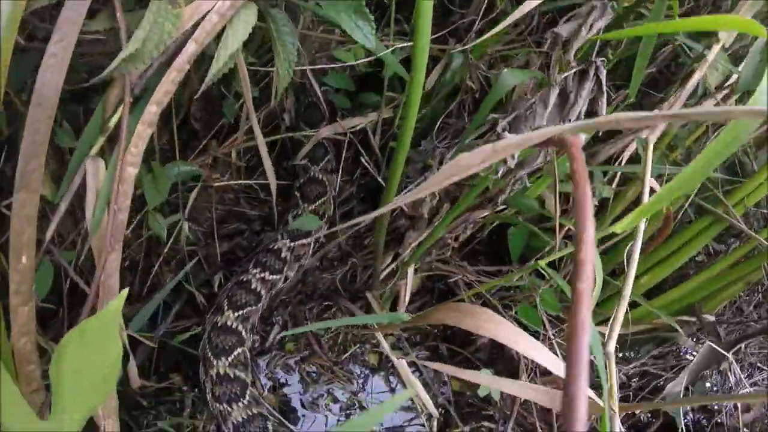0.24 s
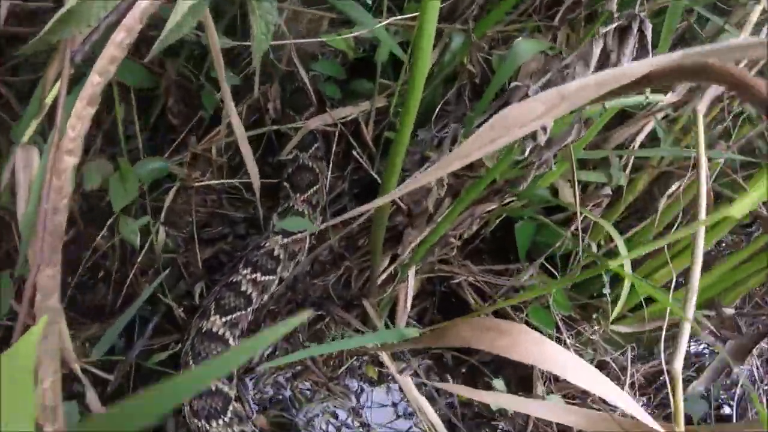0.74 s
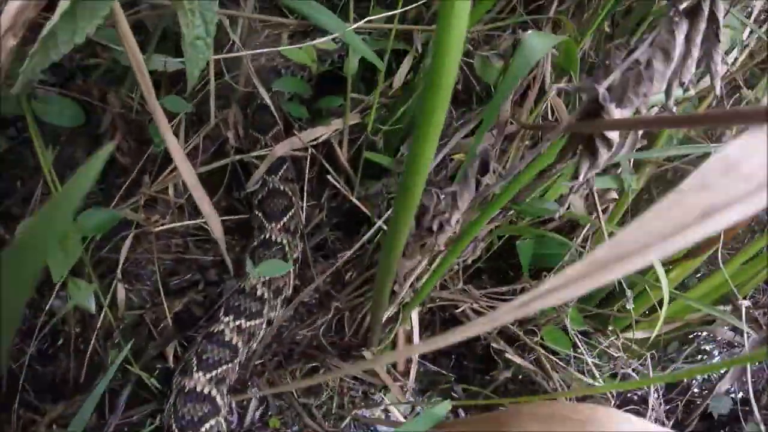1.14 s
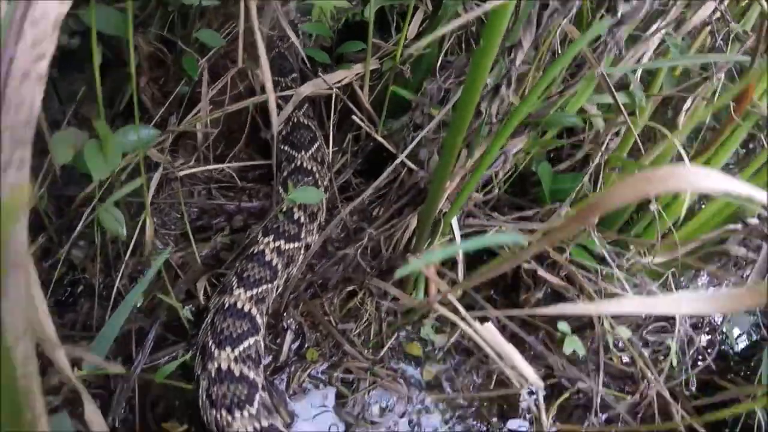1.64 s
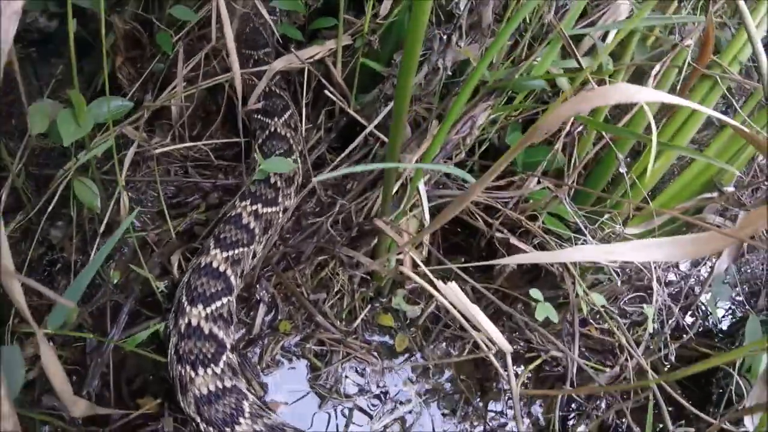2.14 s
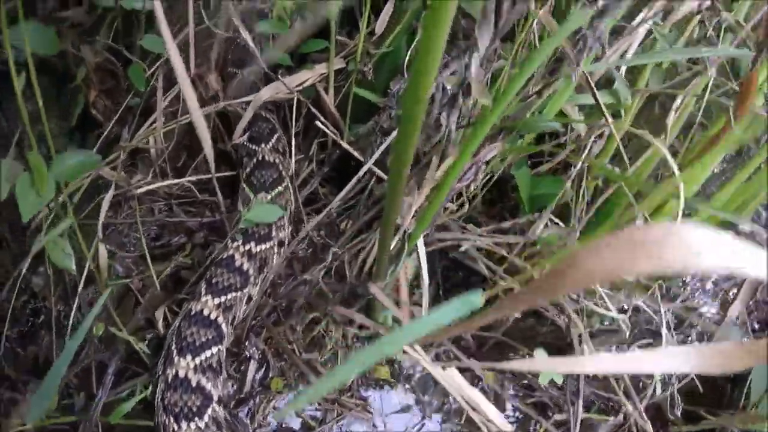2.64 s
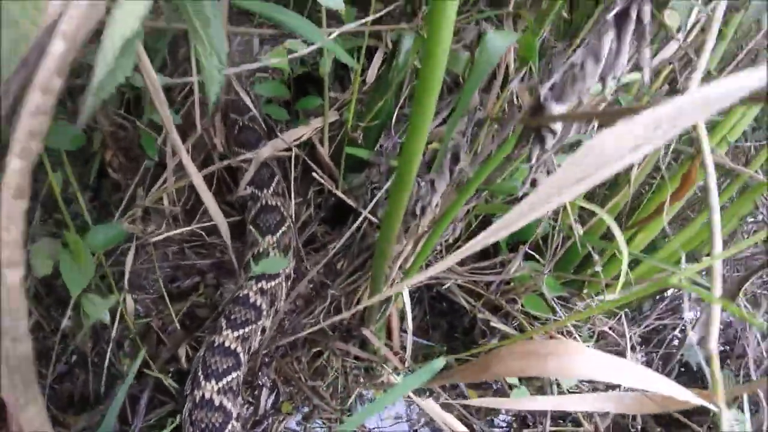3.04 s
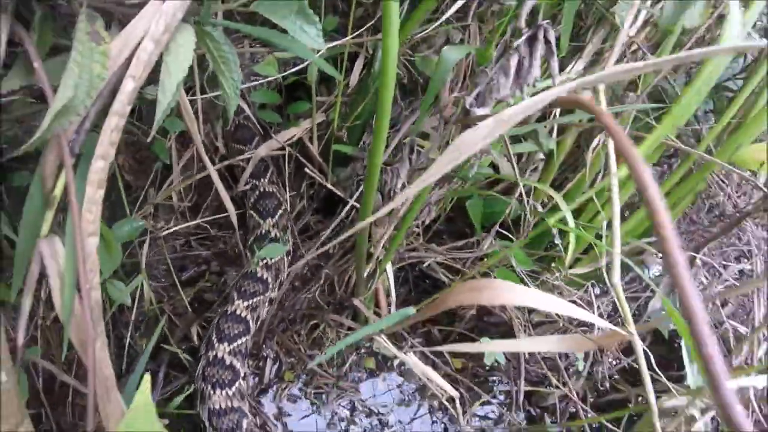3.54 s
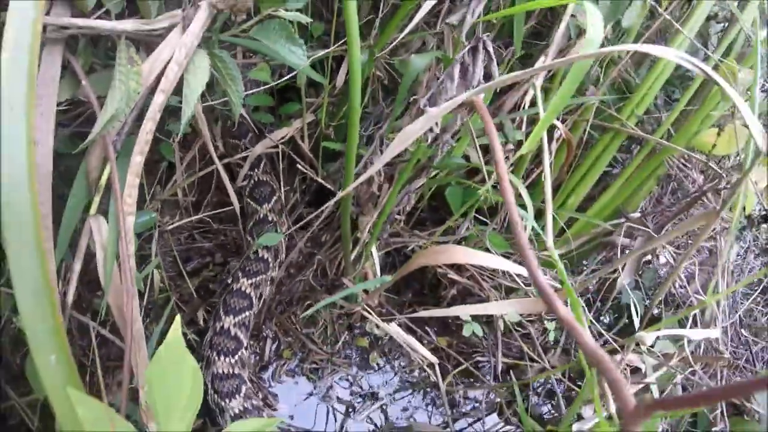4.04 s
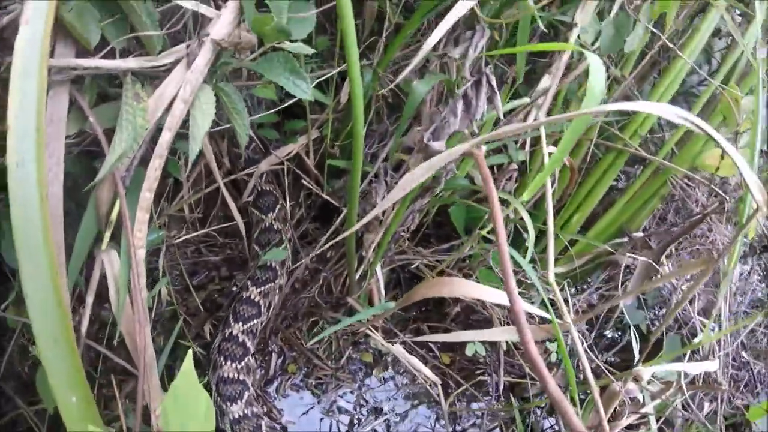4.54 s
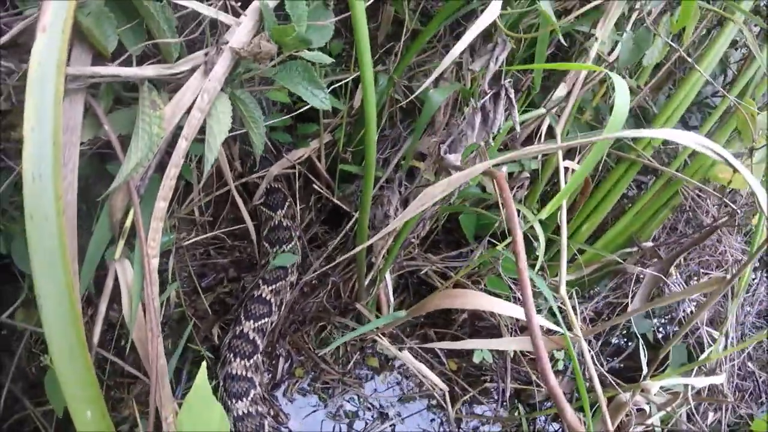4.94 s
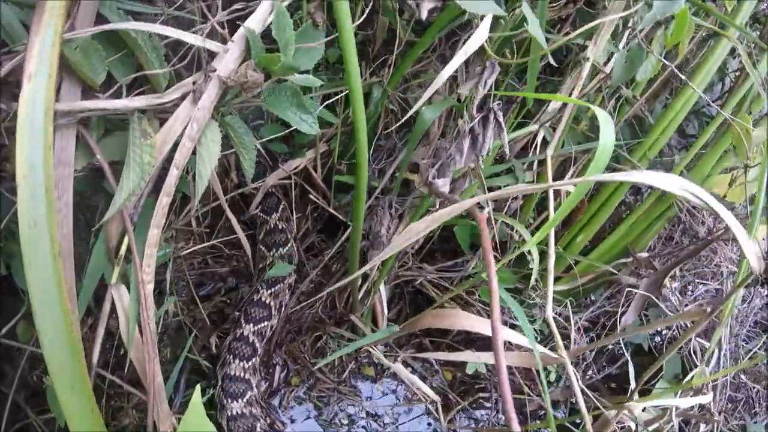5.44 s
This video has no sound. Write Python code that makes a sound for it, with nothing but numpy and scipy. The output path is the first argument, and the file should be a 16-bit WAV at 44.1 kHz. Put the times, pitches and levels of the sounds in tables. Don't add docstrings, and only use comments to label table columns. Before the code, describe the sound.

A small sealed camera pushes through dry grass in a quiet outdoor spot. Light brushing comes first, then firmer scrapes, sharp plastic clicks and dull low thumps between about one and two seconds. A pause follows, then a brief crackle near four seconds, then only very faint low rumble and microphone hiss. Everything is extremely close, boxy and mid-heavy.

```python
import sys
import numpy as np
from scipy import signal
from scipy.fft import rfft, irfft
from scipy.io import wavfile
from scipy.ndimage import uniform_filter1d, minimum_filter1d

SR = 44100
rng = np.random.default_rng(int(sys.argv[2]) if len(sys.argv) > 2 else 0)


def volts_from_decibels(level):
    exponent = np.asarray(level, float) / 20
    return 10 ** exponent


def bounce(signal):
    frames = np.transpose(np.atleast_2d(signal))
    limited = np.clip(frames, -1, 1)
    pcm = np.round(limited * 32767).astype(np.int16)
    wavfile.write(sys.argv[1], SR, pcm)


N = 250488


def unit(x):
    return x / np.sqrt(np.mean(x ** 2) + 1e-20)


def lowpass(f, hz, order):
    return 1 / (1 + 1j * np.sqrt(2) * f / hz - (f / hz) ** 2) ** order


def modes(table, f, weight=lambda hz: 1):
    total = 0
    for k, (hz, width_hz, db) in enumerate(table):
        damping = 1j * f * width_hz
        total = total + (-1) ** k * volts_from_decibels(db) * weight(hz) * damping / (hz * hz - f * f + damping)
    return total


def ring(force, response):
    out = irfft(rfft(force) * response, len(force))
    return out * np.linalg.norm(force) / (np.linalg.norm(out) + 1e-20)


def add(track, s, piece):
    i = round(s * SR)
    part = track[max(i, 0):i + len(piece)]
    part += piece[max(-i, 0):][:len(part)]


# (frequency [Hz], density [dB per Hz])
FIELD_SPECTRUM = [(12, -32), (20, -0.5), (43, -0.5), (66, -17.5), (92, -2), (124, -10), (294, -13.5),
                  (421, -17), (603, -17.5), (753, -19.5), (1270, -23), (2930, -28), (15000, -49)]
# (time [s], level [dB])
FIELD_LEVEL = [
    (0.0, -58.5),
    (1.12, -59),
    (5.68, -59),
]


def field():
    hz, _, z = signal.stft(rng.standard_normal(N + 2048), SR, nperseg=2048)
    patches = uniform_filter1d(rng.standard_normal(z.shape), size=20, axis=0)
    patches = uniform_filter1d(patches, size=4, axis=1)
    f, db = np.transpose(FIELD_SPECTRUM)
    colour_db = np.interp(np.log(hz + 1), np.log(f + 1), db)
    z = z * volts_from_decibels(colour_db[:, None] + 0.41 * unit(patches))
    noise = signal.istft(z, SR, nperseg=2048)[1][:N]
    s, level_db = np.transpose(FIELD_LEVEL)
    return volts_from_decibels(np.interp(np.arange(N) / SR, s, level_db) + 6) * unit(noise)


# (time [s], peak [dB], pitch [Hz], t60 [s], knock [dB])
MOUNT_JOLTS = [(0.134, -43, 113, 0.11, -15), (0.705, -42, 104, 0.24, -27), (0.81, -44.5, 100.5, 0.29, -26),
               (1.06, -39, 103.3, 0.35, -6.5), (1.121, -38, 102.7, 0.23, -7.5), (1.18, -46, 95, 0.16, -6),
               (1.33, -39.5, 77.4, 0.19, -8.5), (1.369, -41, 104, 0.21, -17), (1.454, -53, 94, 0.2, -2),
               (1.584, -50, 85, 0.3, 0.5), (1.659, -44.5, 124, 0.39, 1), (1.683, -37, 101, 0.52, -7),
               (1.776, -24, 99, 0.091, -17.5), (1.793, -40.5, 127, 0.17, -5.5),
               (1.861, -46.5, 96.6, 0.33, -6), (2.042, -28.5, 95.7, 0.26, -19.5),
               (2.158, -40.5, 96, 0.17, -15.5), (3.883, -35.5, 85.6, 0.23, -15)]
# (frequency [Hz], width [Hz], level [dB])
GRIP_MODES = [(140, 18.6, 15), (332, 36, 2.5), (436, 34, -5), (700, 170, -8)]


def mount():
    rise_s, knock_t60_s = 0.011, 0.061
    track, t = np.zeros(N), np.arange(SR // 2) / SR
    f = np.fft.rfftfreq(len(t), 1 / SR)
    grip = modes(GRIP_MODES, f) * lowpass(f, 1800, order=1)
    for s, db, hz, t60_s, knock_db in MOUNT_JOLTS:
        swing_env = volts_from_decibels(db + 2.5 - 60 * t / t60_s) * (1 - np.exp(-t / rise_s))
        swing = swing_env * np.sin(2 * np.pi * hz * t)
        push = volts_from_decibels(db + knock_db + 7.5 - 60 * t / knock_t60_s) * rng.standard_normal(len(t))
        add(track, s, swing + ring(push, grip))
    return track


def housing(f):
    shell = (1 - lowpass(f, 550, order=1)) * lowpass(f, 3880, order=2)
    thin = (f / 5000 * lowpass(f, 5860, order=1)) ** 2
    thin = thin * (f / 5000) ** 2 * lowpass(f, 7400, order=1)
    cavity = 5250 ** 2 - f * f
    port = (cavity + 1j * f * 150) / (cavity + 1j * f * 900)
    return shell * port, thin * port


def near(spot_hz):
    return lambda hz: np.exp(-.5 * (np.log(hz / spot_hz) / .36) ** 2)


# (frequency [Hz], width [Hz], level [dB])
PANEL_MODES = [(983, 180, 8.5), (1347, 275, 7.5), (1889, 141, 11.5), (2079, 82, 7.5), (2380, 257, 8),
               (2826, 207, 6), (3047, 120, 5.5), (3320, 510, 2.5), (4135, 640, 2.5), (5450, 250, 9)]
# (frequency [Hz], width [Hz], level [dB])
WALL_MODES = [(4524, 680, 8), (5920, 375, 9.5), (6750, 1070, 0.5), (8080, 304, 0), (8770, 230, -6),
              (13900, 970, -16.5), (14100, 1900, -22)]
# (time [s], pressure [dB], dry edge [dB], place on the housing [0-2])
PUSHES_IN = [
    [(0, -58, -23, 0.41), (.06, -82, -14, 1.7), (.12, -50.5, -20, 1.25), (.175, -52.5, -22, 1),
     (.225, -67, -23, .8), (.42, -69.5, -25, 1.2), (.67, -60.5, -19, 0.7)],
    [(.68, -62.5, -10, 1.8), (.75, -55, -18, 1), (.83, -53, -16, 1.05), (.88, -57.5, -15, 1.3),
     (.95, -43.5, -18, 1.1), (.995, -58, -19, 0.9), (1.07, -54.5, -15, 1.05), (1.11, -40, -18, .9)],
    [(1.12, -47, -10, 0.49), (1.15, -52.5, -19, 0.91), (1.245, -49, -19, 1.2), (1.3, -37.5, -11, 1.22),
     (1.39, -49, -13.5, 0.57), (1.41, -44.5, -4, 2.1), (1.48, -51, -13.5, 1.25), (1.55, -55, -28.5, 1.6)],
]
# (time [s], pressure [dB], dry edge [dB], place on the housing [0-2])
PUSHES_TURNING = [
    [(1.575, -47, -11.5, 0.81), (1.635, -42.5, -8.5, 1.76), (1.65, -64, -15, 0.78), (1.68, -40.5, -5, 0.42),
     (1.74, -47, -16, .6), (1.785, -45.5, -14.5, 0.47), (1.83, -57, -11, 0.4), (1.93, -59.5, -8, 1.6)],
    [(1.94, -54, -18, 1.1), (1.965, -53, -15, 1.3), (2.03, -42.5, -16.5, 1.2), (2.065, -43, -15.5, 0.6),
     (2.08, -56.5, -15, 1.2), (2.12, -42, -21, 1.5), (2.18, -89, -20, 1.2)],
    [(3.38, -59, -9, 1.2), (3.42, -67.5, -10, 2.1), (3.455, -59, -16, 1.3), (3.52, -57, -11, 0.86),
     (3.55, -81, -12, 1)],
    [(3.66, -64, -14, 1.7), (3.72, -58, -16, 1.26), (3.775, -52.5, -9.5, .9), (3.83, -58.5, -6, 0.88),
     (3.88, -48.5, -9.5, 2.7), (3.93, -67, -11, 1.3), (3.965, -67, -1, 0.85)],
]


def slide():
    lift_s = .015
    spots_hz = (1400, 2200, 4200)
    reach = 0.54
    clump_db, clump_ms, rib_db = 1, 6, 1.5
    t, f = np.arange(N) / SR, np.fft.rfftfreq(N, 1 / SR)
    shell, thin = housing(f)
    noise, grit, clumps, hiss = rng.standard_normal((4, N))

    press = np.zeros(N)
    for push in PUSHES_IN + PUSHES_TURNING:
        s, db = np.transpose(push)[:2]
        gate = np.interp(t, [s[0] - lift_s, s[0], s[-1], s[-1] + lift_s], [0, 1, 1, 0])
        press += volts_from_decibels(np.interp(t, s, db)) * gate
    clumps = unit(uniform_filter1d(clumps, size=round(clump_ms * SR / 1000)))
    ribs = unit(uniform_filter1d(grit, size=60))
    press = press * unit(volts_from_decibels(rib_db * ribs + clump_db * clumps))

    s, _, edge_db, place = np.transpose(np.concatenate(PUSHES_IN + PUSHES_TURNING))
    place_now = np.interp(t, s, place)
    body = np.zeros(N)
    for k, hz in enumerate(spots_hz):
        share = np.exp(-.5 * ((place_now - k) / reach) ** 2)
        body += ring(share * press * np.sign(noise), modes(PANEL_MODES, f, near(hz)) * shell)
    edge_force = volts_from_decibels(np.interp(t, s, edge_db)) * press * hiss
    return body + ring(edge_force, modes(WALL_MODES, f) * thin)


# (time [s], level [dB], dry edge [dB], contact spot [Hz])
TIP_FLICKS = [(.541, -50.5, -22, 2400), (.7025, -42, -16, 2890), (.7111, -39.5, -30, 2560),
              (0.756, -31.5, -17, 2270), (.763, -36, -19, 2110), (0.7755, -36, -15, 2900),
              (0.8506, -41.5, -16, 2300), (.9097, -43, -30, 3050), (0.9809, -34.5, -32, 2030),
              (3.93, -54, 6, 3100), (1.1275, -14, -13.5, 3600), (1.1685, -39, -19, 3000),
              (1.1171, -15, -20, 2280), (1.121, -24, -22, 2280), (1.3505, -19, -3.5, 2970),
              (1.3767, -17, -13.5, 3630), (1.4291, -27, -28, 3800), (1.4392, -35, -11, 2490),
              (1.659, -28, -24, 1690), (1.6662, -26.5, -10, 4280), (1.969, -18, -21.5, 2560),
              (1.99, -27, -24, 2940), (1.9981, -29.5, -24, 2500), (2.043, -34.5, -8, 6700),
              (2.121, -28, -17.5, 2150), (2.166, -50.5, -17, 3600), (3.884, -34, -9, 3100),
              (3.9127, -24, -10, 3220), (3.921, -40, -3, 3200), (3.9452, -31, -11.5, 2860)]
# (time [s], level [dB], slide [ms per 10 dB], contact spot [Hz])
BLADE_BRUSHES = [(0.0736, -33, 13.5, 2120), (.117, -36.5, 12, 2240), (1.662, -40, 20.5, 1300),
                 (1.7415, -47, 18, 1400), (0.133, -44.5, 30, 3240), (0.353, -43, 2, 2570),
                 (0.402, -45, 7, 1780), (.4599, -47.5, 9.5, 1850), (0.804, -34.5, 3, 2340),
                 (0.8932, -43.5, 11, 2500), (0.931, -34.5, 27, 2400), (1.1777, -39, 5, 1900),
                 (1.2015, -32.5, 1, 2600), (1.228, -33, 7.5, 2860), (1.3331, -21, 4, 2320),
                 (1.047, -39, 2.5, 2600), (2.045, -32, 14, 3770), (1.768, -26, 10, 4900),
                 (1.3483, -24, 21, 3300), (1.4451, -36.5, 32, 3470), (1.501, -35, 12, 2000),
                 (1.577, -45, 14, 1380), (1.674, -25.5, 7.5, 2650), (1.714, -32.5, 4.5, 2380),
                 (1.776, -28.5, 3, 2840), (1.7942, -43, 34, 4100), (2.126, -45.5, 12, 800),
                 (3.8902, -25.5, 5, 2780), (3.775, -51.5, 58, 5130)]
# (time [s], level [dB], bend [ms per 10 dB], contact spot [Hz])
BLADE_DRAGS = [(0.0914, -33.5, 9.5, 2300), (1.324, -40, 4, 1460), (1.331, -29.5, 7, 5000),
               (1.7129, -42, 37, 1400), (2.068, -57, 26, 1530), (0.1233, -39, 6, 2260),
               (0.1485, -37.5, 7, 2100), (0.2094, -43, 6, 2400), (.64, -49, 12, 2640),
               (0.796, -36, 5, 2510), (0.8304, -37, 8, 2870), (0.9201, -32, 10, 2130),
               (0.9739, -37, 23, 1950), (1.3415, -31.5, 12, 3300), (1.0794, -37.5, 12.5, 1980),
               (1.133, -33, 13, 3030), (1.3135, -31.5, 9, 3600), (1.392, -31.5, 39, 3700),
               (1.4894, -33, 5, 3780), (1.592, -30, 9, 2670), (1.6334, -36, 8, 3400),
               (1.7066, -29, 17, 3810), (1.7673, -26, 25.5, 3400), (2.0325, -50, 10, 2640),
               (3.898, -32.5, 10, 2740), (3.774, -51, 47, 5170), (3.474, -56, 32, 5000),
               (3.4595, -48.5, 28, 2080)]


def contacts():
    flick_rise_ms, flick_fall_ms, catch_ms, release_ms = .7, 3, .7, 3
    stiffer = .35
    push_s, _, push_edge_db, _ = np.transpose(np.concatenate(PUSHES_IN + PUSHES_TURNING))
    blades = []
    for s, db, edge_db, hz in TIP_FLICKS:
        fall_ms = flick_fall_ms * volts_from_decibels(-stiffer * (db + 27.5))
        blades.append((s, flick_rise_ms, fall_ms, db, edge_db, hz))
    for s, db, slide_ms, hz in BLADE_BRUSHES:
        blades.append((s, catch_ms, slide_ms, db, np.interp(s, push_s, push_edge_db), hz))
    for s, db, bend_ms, hz in BLADE_DRAGS:
        blades.append((s, bend_ms, release_ms, db, np.interp(s, push_s, push_edge_db), hz))
    return blades


def grass():
    damp_dulls, dry_db = .09, -12
    track, size = np.zeros(N), 8192
    lead = size // 2
    ms = (np.arange(size) - lead) * 1000 / SR
    f = np.fft.rfftfreq(size, 1 / SR)
    shell, thin = housing(f)
    for s, rise, fall, db, edge_db, spot_hz in contacts():
        noise, grit, hiss = rng.standard_normal((3, size))
        scatter = rng.standard_normal(len(PANEL_MODES + WALL_MODES))

        snags = volts_from_decibels(3 * unit(uniform_filter1d(grit, size=60)))
        held = max(fall - .9, .3)
        smooth = volts_from_decibels(db - 10 * np.where(ms < 0, -ms / rise, ms / held))
        press = smooth * snags
        press = press * np.linalg.norm(smooth) / np.linalg.norm(press)
        press = press * np.sqrt((rise + fall) / (rise + held))
        snap = 6.5 * volts_from_decibels(db) * np.exp(-rise / 1.3) * (ms == 0)

        struck = [(hz, w, level + 2 * d) for (hz, w, level), d in zip(PANEL_MODES, scatter)]
        body = ring(press * np.sign(noise) + snap, modes(struck, f, near(spot_hz)) * shell)

        brushed = [(hz, w, level + 1.8 * d) for (hz, w, level), d in zip(WALL_MODES, scatter[::-1])]
        fade = volts_from_decibels(-10 * np.maximum(ms, 0) / held * 0.22 * np.exp(-rise / 1.6))
        tilt = damp_dulls * min(edge_db - dry_db, 4)
        walls = modes(brushed, f, lambda hz: (hz / 6000) ** tilt) * thin
        edge = ring(1.1 * press * fade * hiss + 0.92 * snap, walls)
        add(track, s - lead / SR, body + volts_from_decibels(edge_db) * edge)
    return track


def scene():
    return (field() + mount() + slide() + volts_from_decibels(-2.05) * grass())[None]


def thin_treble(x):
    f, _, z = signal.stft(x, SR, nperseg=1024)
    patch = uniform_filter1d(np.abs(z) ** 2, size=4, axis=0)
    patch = uniform_filter1d(patch, size=2, axis=1)
    weak = (f[:, None] > 12800) & (patch < .85 * np.median(patch, axis=1, keepdims=True))
    return signal.istft(z * ~weak, SR, nperseg=1024)[1][:N]


# (time [s], kept below [Hz])
STARVED_FRAMES = [(.005, 4000), (.412, 3600), (.476, 4300), (.582, 5000), (.923, 7500), (1.69, 6500),
                  (2.246, 3500), (2.46, 3800), (3.376, 3200), (4.528, 5500), (4.764, 5200), (4.913, 3400)]


def starve(x):
    share, size = .2, 1024
    f = np.fft.rfftfreq(size, 1 / SR)
    for s, keep_hz in STARVED_FRAMES:
        at = np.clip(round(s * SR) + np.arange(size) - size // 2, 0, N - 1)
        lines = rfft(x[at])
        rank = np.abs(lines) * f ** 0.99 * (f < keep_hz)
        local_max = -minimum_filter1d(-rank, size=15)
        tops = (rank > .8 * local_max) & (rank > share * rank.max())
        kept = irfft(lines * ((f < 600) + 2.1 * (f >= 600) * tops), size)
        out = x.copy()
        out[at] += 0.98 * np.hanning(size) ** 0.8 * (kept - x[at])
        x = out
    return x


def band_limit(x):
    return signal.sosfilt(signal.butter(12, 16430, fs=SR, output="sos"), x)


def record(dry):
    top_hz = 15250
    f = np.fft.rfftfreq(N, 1 / SR)
    limited = irfft(rfft(dry[0]) / (1 + (f / top_hz) ** 80), N)
    mix = starve(thin_treble(limited))
    return band_limit(mix[None])


dry = scene()
out = record(dry)
bounce(out)
```